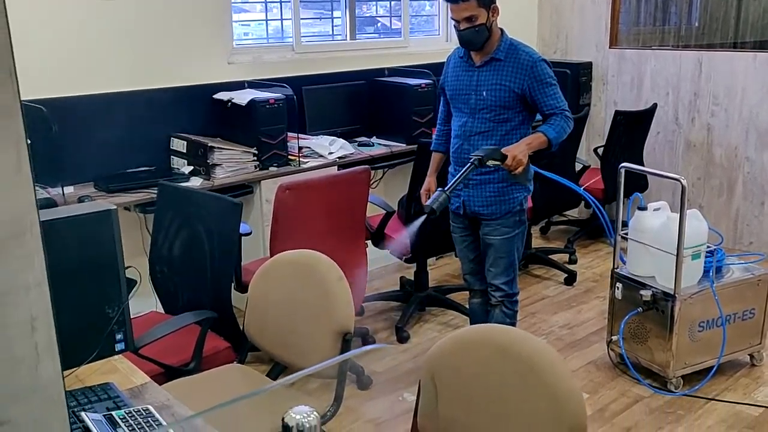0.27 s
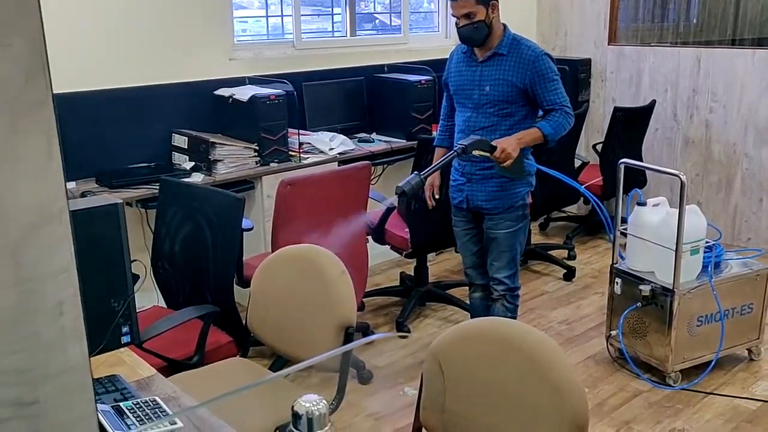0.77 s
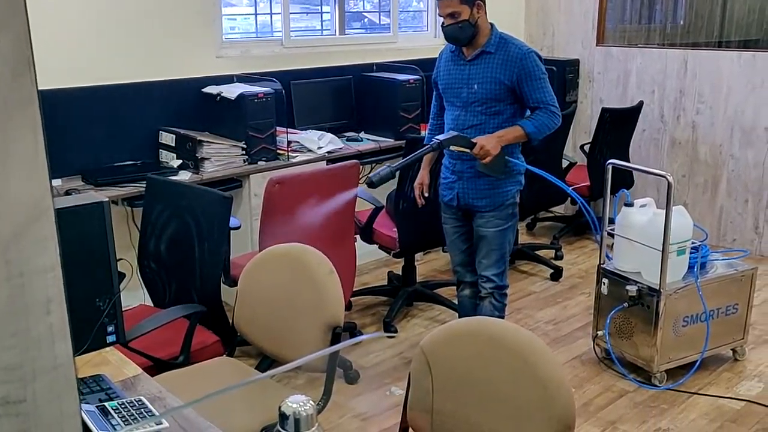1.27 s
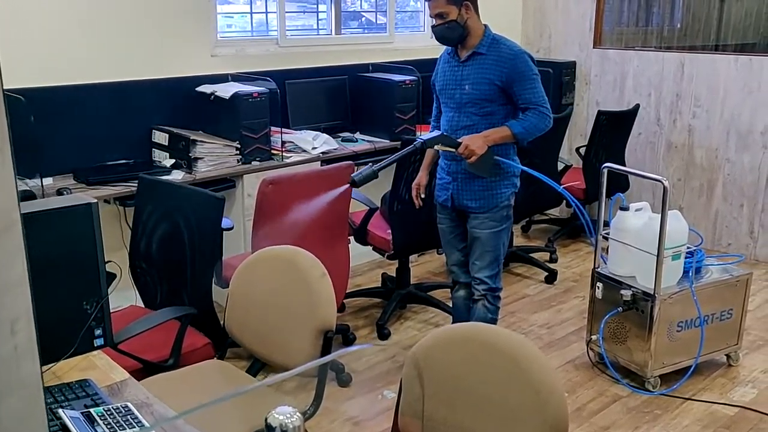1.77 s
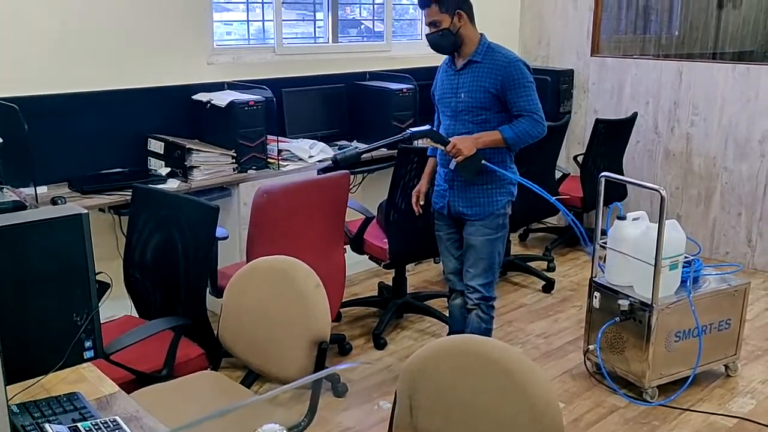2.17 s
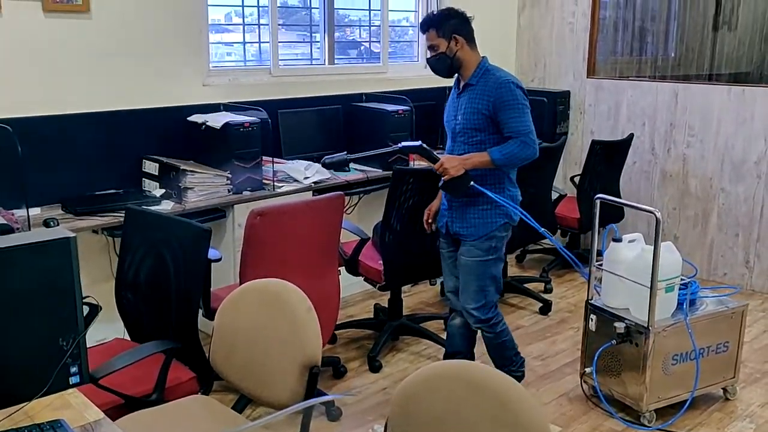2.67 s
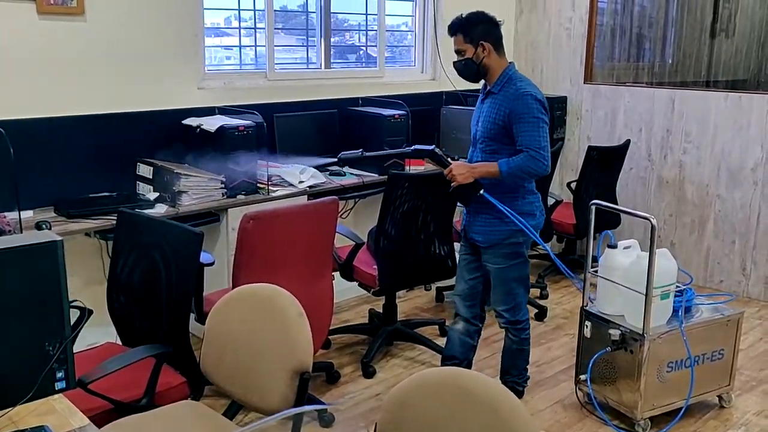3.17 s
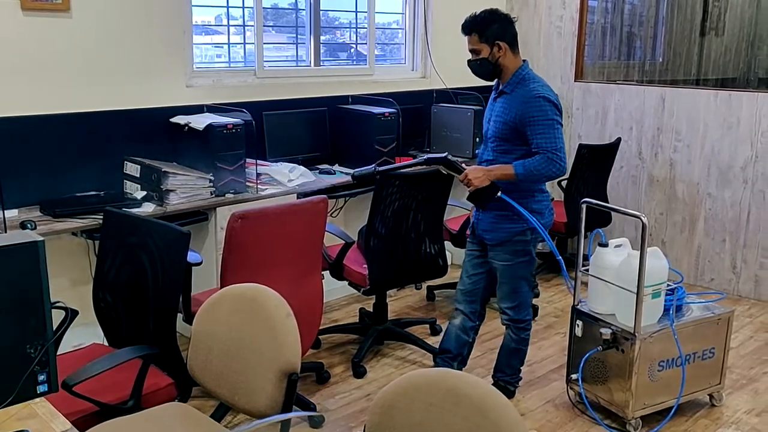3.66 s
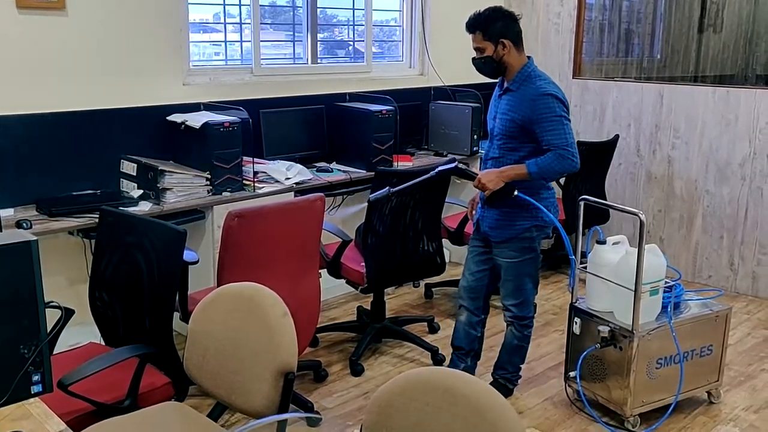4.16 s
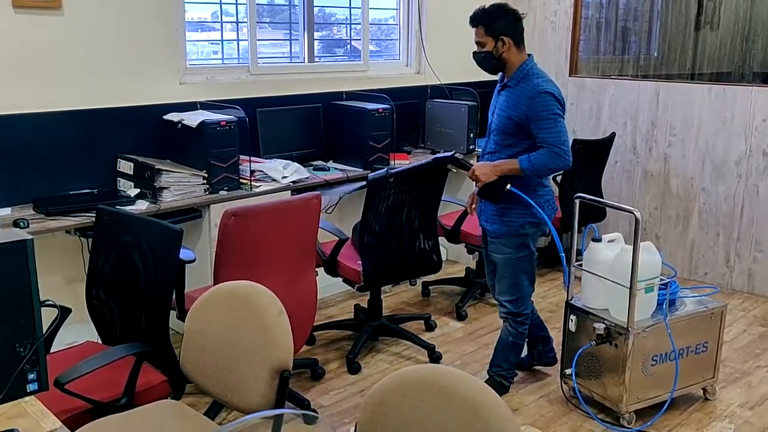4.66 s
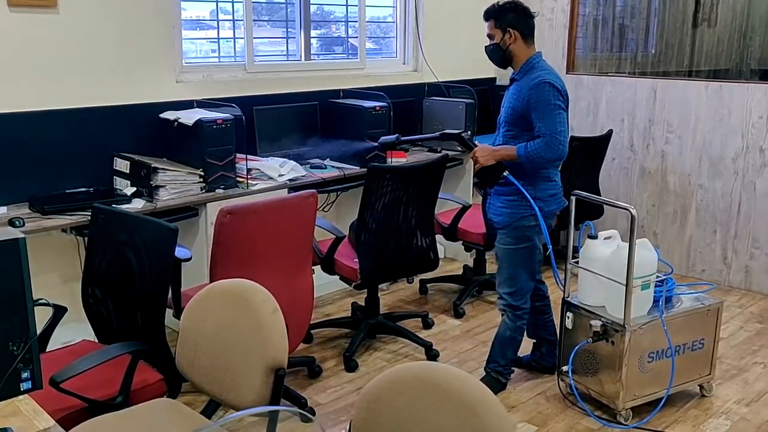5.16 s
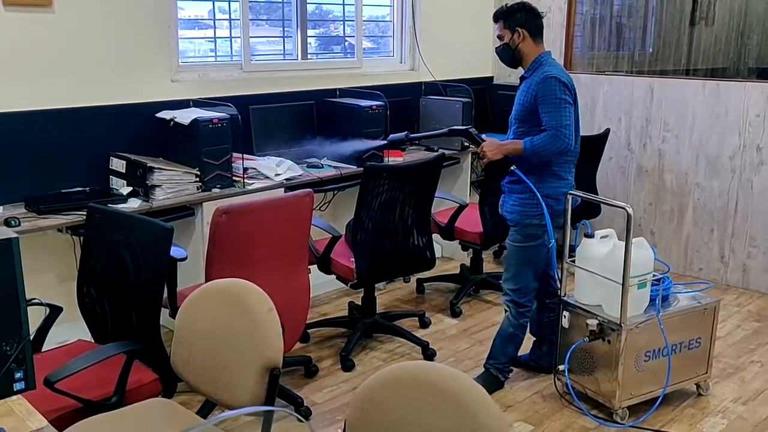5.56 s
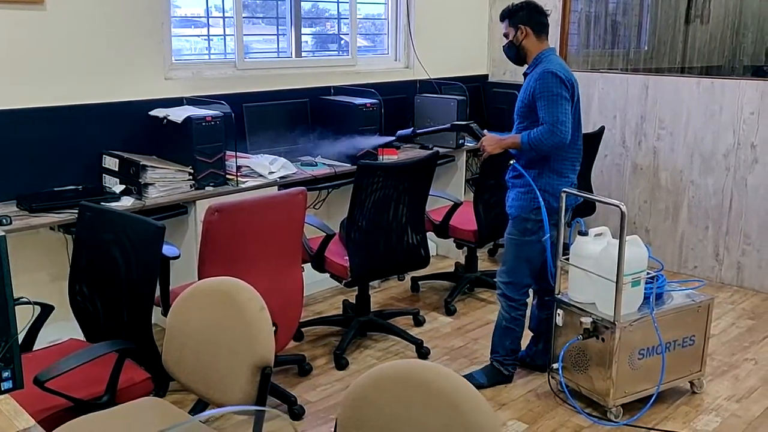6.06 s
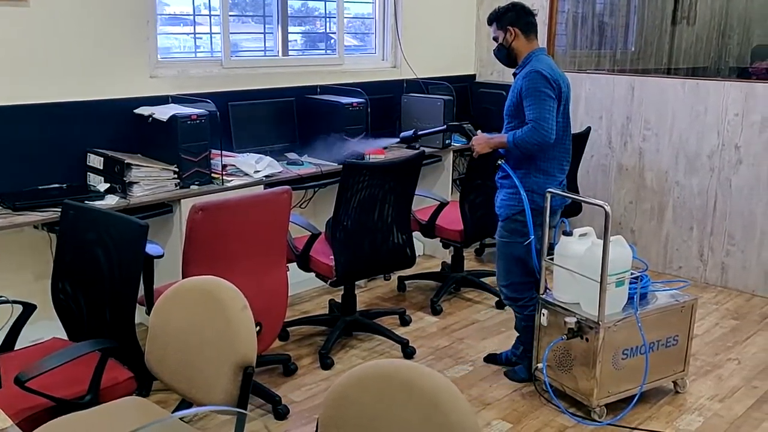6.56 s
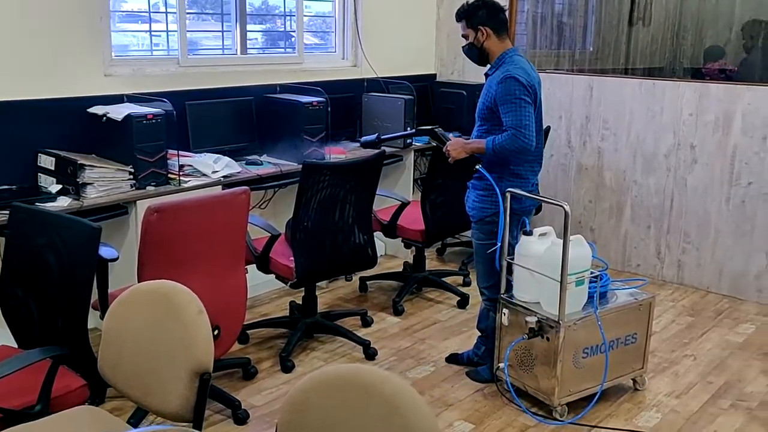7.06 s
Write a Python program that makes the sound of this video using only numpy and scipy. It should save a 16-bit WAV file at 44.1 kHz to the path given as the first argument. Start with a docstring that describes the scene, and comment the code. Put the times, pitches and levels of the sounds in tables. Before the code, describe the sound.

A constant, high, grainy hiss of spraying dominates, backed by a quieter motor drone with low hum, rattly panel rumble and a faint fluttering whine. Everything lifts a little before one second and then holds, with small brightness changes as the nozzle turns across chairs and desks. Indoor room reflections blend the machine; a phone nearby hears wide treble and nearly centred bass. It ends still spraying.

```python
"""In a small office, an electrostatic sprayer runs a few metres from a phone with two microphone ports.
The air jet of the spray gun hisses without a break: coloured noise, brighter when it swings towards the phone.
The piston compressor in its steel trolley drones: sine tones at multiples of its shaft speed.
Filtered noise makes the cabinet rumble and the cooling air; further tones make hum, swelling drones and a whine.
The room blends it all: low sounds are nearly alike at both ports, high ones differ."""
import sys
import numpy as np
from scipy import signal
from scipy.fft import rfft, irfft
from scipy.io import wavfile
from scipy.ndimage import map_coordinates

SR = 44100
rng = np.random.default_rng(int(sys.argv[2]) if len(sys.argv) > 2 else 0)


def dump_mix(stems):
    """Bounce the given channels to the path in sys.argv[1] as a 16-bit WAV at rate SR."""
    frames = np.atleast_2d(stems).T  # one column per channel
    limited = np.clip(frames, -1, 1)  # hard clip at full scale
    pcm = np.round(limited * 32767).astype(np.int16)
    wavfile.write(sys.argv[1], SR, pcm)


N = 322371
TIME = np.arange(N) / SR  # t/s
FREQ = np.maximum(np.fft.rfftfreq(N, 1 / SR), 1)  # f/Hz
PORT_DELAY_S = 0.159 / 343  # distance between the ports in m, over the speed of sound in m/s
PORT_SIGNS = np.array([[1], [-1]])  # left, right
MIDWAY_S = 3.65  # steady level drifts pass through zero here
SHAFT_HZ = 24.07


def undb(db):
    """Turn decibels into a gain."""
    return 10 ** (np.asarray(db) / 20)


def level(x, db):
    """Scale a sound to an rms level in dB."""
    return x * undb(db) / np.sqrt(np.mean(x ** 2))


def colour(points):
    """Draw a smooth gain curve over frequency through (f/Hz, level/dB) points."""
    hz, db = np.transpose(points)
    return undb(np.interp(np.log(FREQ), np.log(hz), db))


def walk(rate):
    """Smooth random change, about rate times a second, with an rms of 1."""
    smooth = np.exp(-(np.fft.rfftfreq(N, 1 / SR) / rate) ** 2)
    return level(irfft(rfft(rng.standard_normal(N)) * smooth, N), 0)


def swell(peak_s, attack_s, release_s):
    """A smooth bump of height 1 with its own rise and fall times."""
    side_s = np.where(TIME < peak_s, attack_s, release_s)
    return np.exp(-((TIME - peak_s) / side_s) ** 2)


def likeness(hz):
    """Sound from all round the room is alike at both ports only where its waves are long."""
    return .99 * np.sinc(2 * hz * PORT_DELAY_S)


def room_noise(gain):
    """Turbulence as the two ports hear it after many reflections: noise that is partly shared."""
    mid, side = rfft(rng.standard_normal((2, N)))
    alike = likeness(FREQ)
    mid = mid * np.sqrt(1 + alike)
    side = side * np.sqrt(1 - alike)
    return level(irfft(np.array([mid + side, mid - side]) * gain, N), 0)


def room_tone(hz, clock, db, wander_db, phase, spread=0.34):
    """A tone whose level and phase drift as the phone moves through the room's standing waves."""
    apart = spread * np.arccos(likeness(hz)) / 2 * rng.choice([-1, 1]) * PORT_SIGNS
    angle = 2 * np.pi * hz * clock + phase + 0.074 * wander_db * walk(1.0)
    gain = np.sqrt(2) * undb(db + wander_db * walk(0.64))  # a sine's peak is root two times its rms
    return gain * np.cos(angle + apart)


# Colour of the air jet at the nozzle: f/Hz, relative level/dB
JET_COLOUR = [(300, -26.5), (1300, -24), (2000, -22.5), (2700, -18), (3300, -15.5), (4100, -12),
              (4700, -7.5), (5300, -3.5), (5800, -2), (6400, 3.5), (6900, 1.36), (7600, -1.3), (8200, -3.5),
              (8800, -12), (12200, -13.5), (15700, -10)]
# How the two ports differ in colour: f/Hz, left minus right level/dB
PORT_COLOUR = [(300, 29.5), (800, 10), (2400, 1.5), (5100, -1), (5800, 6.5), (6350, 5.5), (7000, 0),
               (7600, -4.5), (8700, -2), (12000, 0.2)]


def spray(beam_hz, near_db, body_hz, body_width_hz, body_shake_db, core_hz, core_width_hz):
    """The jet's turbulence hisses: a smooth core, grainier noise above and below it, an aimed treble beam."""
    hiss_db, top_db = aim(shake_db=0.07, top_shake_db=-0.1, shake_rate=12, top_rest_db=0.8)
    air = level(room_noise(1) + undb(near_db) * near_paths(sway_s=0.000293), 0)
    core = np.exp(-((FREQ - core_hz) / core_width_hz) ** 4)
    outer = roughen(air, depth_db=7, band_hz=30, hold_s=.04)
    air = rfft(air) * core + rfft(outer) * (1 - core)
    ports = colour(PORT_COLOUR) ** (PORT_SIGNS / 2)  # half the difference goes to each port
    jet = level(irfft(air * colour(JET_COLOUR) * ports, N), 0)
    beam = irfft(rfft(jet) / (1 + (beam_hz / FREQ) ** 10), N)
    body = irfft(rfft(jet) * np.exp(-((FREQ - body_hz) / body_width_hz) ** 2), N)
    # the body is up to 3 dB fuller at first, while the gun points at the floor
    body_db = 3 * swell(0, 1.2, 1.2) + body_shake_db * walk(5.5)
    return (jet + beam * (undb(top_db) - 1) + body * (undb(body_db) - 1)) * undb(hiss_db)


# Broad swells of the hiss as the gun sweeps over chairs and desks: peak t/s, half length t/s, level/dB
GUN_SWEEPS = [(1.08, 0.23, 0.9), (2.45, 0.38, 0.5), (4.0, 0.33, .5), (5.07, 0.48, 0.5), (7.2, 0.14, 0.8)]
# Moments when the beamed treble brushes the phone, or dips (negative): peak t/s, half length t/s, level/dB
BEAM_FLASHES = [(.05, 0.28, 3.5), (.45, 0.3, 1.6), (.95, 0.13, 0.2), (1.95, 0.15, 0.5), (3.267, 0.12, 1.5),
                (4.397, .1, -2), (4.95, 0.12, 1.5), (5.55, .1, -0.8), (6.382, 0.23, 1.1)]


def aim(shake_db, top_shake_db, shake_rate, top_rest_db):
    """Pointing the gun changes the hiss and, separately, its narrow treble beam; the hand is unsteady."""
    sweep_db = sum(db * swell(s, half_s, half_s) for s, half_s, db in GUN_SWEEPS)
    flash_db = sum(db * swell(s, half_s, half_s) for s, half_s, db in BEAM_FLASHES)
    fade_db = 0.21 * (TIME - MIDWAY_S)  # 0.21 dB lost each second
    hiss_db = sweep_db - fade_db + shake_db * walk(shake_rate)
    # take the sweeps out again, so they leave the narrow beam unchanged
    top_db = top_rest_db + flash_db - sweep_db + top_shake_db * walk(shake_rate)
    return hiss_db, top_db


def near_paths(sway_s, count=3):
    """The jet's noise arrives straight and off desks and walls; each path changes as the gun moves."""
    source, out = rng.standard_normal(N), 0
    for k in range(count):
        delay = k * (.002 + .002 * rng.random()) + sway_s * walk(0.487)
        # the paths reach the ports from the left, the front and the right in turn
        across = (k % 3 - 1 + .05 * walk(1.0)) * PORT_DELAY_S * PORT_SIGNS / 2
        place = np.arange(N) - SR * (delay + .9 * across)
        path = map_coordinates(source, [place], order=5, mode="mirror")
        out = out + path * undb(-.3 * k)
    return level(out, 0)


def roughen(x, depth_db, band_hz, hold_s, size=1024):
    """Narrow-band random gain roughens the noise, mostly shared by both channels."""
    cells = signal.stft(x, nperseg=size)[2]
    chance = rng.standard_normal((3,) + cells.shape[1:])
    chance = chance[:2] + 2 * chance[2]  # own part of each port, plus a stronger shared part
    steps = np.arange(-12, 13)
    across = np.exp(-(steps * SR / size / band_hz) ** 2)  # smooth over frequency
    along = np.exp(-(steps * size / 2 / SR / hold_s) ** 2)  # smooth over time
    grain = level(signal.fftconvolve(chance, np.outer(across, along)[None], "same"), 0)
    grainy = cells * undb(depth_db * np.tanh(grain))
    return level(signal.istft(grainy, nperseg=size)[1][:, :N], 0)


# Strong tones of the compressor: multiple of the shaft speed, rms level/dB midway, drift in dB per s
SHAFT_TONES = [(2, -38.5, 0), (4, -39, -0.33), (6, -37.5, -0.04), (7, -34.5, -0.43), (9, -32.5, 0.3),
               (10, -53, 0.5), (11, -48.5, 0.5), (12, -55, 0.9), (13, -51, -1), (14, -46.5, -0.5),
               (15, -42, -0.7), (17, -42.5, -0.27), (19, -49.5, -.8), (18, -55.5, -1), (21, -59, 1),
               (22, -58.5, 0), (28, -60.5, 0.5), (46, -64.5, 0)]


def compressor(clock, wander_db, buzz_db, buzz_fall_db, uneven_db, count=48):
    """Piston strokes drone on strong shaft multiples; the casing buzzes on weaker, uneven ones."""
    strong = {round(k): (db, drift) for k, db, drift in SHAFT_TONES}
    out = 0
    for k in range(2, count + 1):
        hz = k * SHAFT_HZ
        weak_db = buzz_db - buzz_fall_db * abs(np.log2(k / 20)) + rng.uniform(-2.7, 1.4)
        db, drift = strong.get(k, (weak_db, 0))
        # loud tones keep step with the stroke to within 0.27 radians; those at -52 dB or less are scattered
        scatter = 0.27 if db > -52 else np.pi
        # the cabinet booms around 155 Hz, 180 Hz wide, and holds tones back in phase there
        boom_lag = 2 * np.arctan(2 * (hz - 155) / 180)
        phase = scatter * rng.standard_normal() - boom_lag
        # short waves have closer quiet spots, so high tones wander more
        out = out + room_tone(hz, clock, db + drift * (TIME - MIDWAY_S), wander_db * k / 10, phase)
    # the strength is uneven from stroke to stroke
    return out * undb(uneven_db * walk(SHAFT_HZ))


# Steel panels and cabinet air, shaken by the motor: f/Hz, width f/Hz, relative level/dB
CABINET_MODES = [(35, 9, -1), (52.7, 12, 9), (101, 5.6, 6), (123.7, 13, 9.5), (155, 34, 1),
                 (185.4, 13.3, 10), (198, 6.3, 11), (375.4, 29, 2), (394, 20, -1), (495.5, 12, 1.5),
                 (648.6, 10.4, -3.5), (744, 16, -8.5), (917, 24, -5)]
# Rush of the motor's cooling air: f/Hz, relative level/dB
COOLING_AIR = [(10, -12), (70, -26), (130, -0.5), (280, -3), (450, 1), (600, -3.5), (1000, -4), (1250, -6),
               (1550, -4), (3000, -15.5)]


def cabinet(clock, rumble_db, fan_db, throb):
    """Resonant panels rumble with the two strokes a turn, over cooling air that pulses more faintly."""
    power = sum(undb(db) ** 2 / (1 + (2 * (FREQ - hz) / width) ** 2) ** 1.97
                for hz, width, db in CABINET_MODES)
    stroke = np.exp(throb * np.cos(2 * np.pi * 2 * SHAFT_HZ * clock))
    rumble = level(room_noise(np.sqrt(power)) * stroke, rumble_db)
    rush = level(room_noise(colour(COOLING_AIR)) * stroke ** 0.5, fan_db)
    return rumble + rush


# Tones that do not follow the shaft: f/Hz, rms level/dB
HUM_TONES = [(200.3, -40), (176, -37), (52.3, -52)]
HUM_WANDER_DB = 1.2  # also used by the whine


def hum():
    """The windings hum at about four times the mains; two lower tones sound with them, apart from the shaft."""
    return sum(room_tone(hz, TIME, db, HUM_WANDER_DB, 2 * np.pi * rng.random()) for hz, db in HUM_TONES)


# Low tones that come and go: peak t/s, f/Hz, rms level/dB at the peak, attack t/s, release t/s
LOW_DRONES = [(0.95, 145, -54, .25, 0.38), (1.2, 88.7, -41, .3, 0.22), (1.95, 185.3, -35, 0.13, .2),
              (3.5, 159.3, -44, .2, 0.44), (4.7, 184, -44, 0.74, 0.18), (5.5, 119.3, -36, 0.68, 0.35),
              (6.05, 120.4, -34.5, 0.26, 0.1), (6.7, 147.8, -43, 0.52, .8), (6.4, 138, -42, .12, .15),
              (7.0, 141, -39, 0.23, 0.25)]


def drones():
    """Low tones swell and drop away at their own moments, some overlapping."""
    out = 0
    for s, hz, db, attack_s, release_s in LOW_DRONES:
        tone = room_tone(hz, TIME, db, 0.62, 2 * np.pi * rng.random())
        out = out + tone * swell(s, attack_s, release_s)
    return out


def whine(flutter_db, flutter_rate, jitter):
    """A faint, unbroken 650 Hz whine of the machine that flutters in level and pitch."""
    clock = np.cumsum(1 + jitter * walk(flutter_rate)) / SR
    return room_tone(650, clock, -57, HUM_WANDER_DB, 0) * undb(flutter_db * walk(flutter_rate))


def scene():
    """Gun and machine sound together; the whole starts a little lower and comes up once."""
    # the induction motor holds its speed almost exactly
    clock = np.cumsum(1 + 0.00038 * walk(2.6)) / SR
    hiss = spray(beam_hz=9300, near_db=1.0, body_hz=3850, body_width_hz=1200, body_shake_db=0.24,
                 core_hz=6730, core_width_hz=1770)
    machine = compressor(clock, wander_db=0.86, buzz_db=-64.5, buzz_fall_db=5.5, uneven_db=0.5)
    machine = machine + cabinet(clock, rumble_db=-38.0, fan_db=-40.5, throb=0.14)
    machine = machine + hum() + drones() + whine(flutter_db=3.0, flutter_rate=7.9, jitter=0.00542)
    # 2.5 dB lower until 0.6 s, then up within 0.21 s
    early_db = 2.5 * (np.clip((TIME - 0.6) / 0.21, 0, 1) - 1)
    return (machine + undb(-19.0) * hiss) * undb(early_db)


def record(dry):
    """The phone cuts the top steeply: a low-pass filter at 15900 Hz."""
    low_pass = signal.ellip(12, .1, 80, 15900, fs=SR, output="sos")
    return signal.sosfilt(low_pass, dry)


dry = scene()
out = record(dry)
dump_mix(out)
```